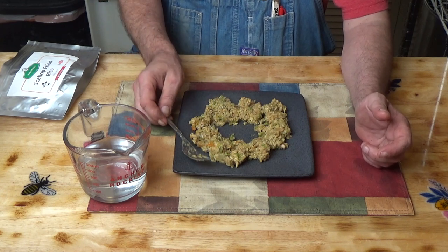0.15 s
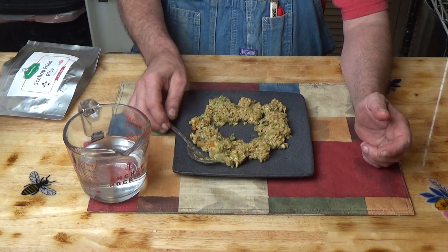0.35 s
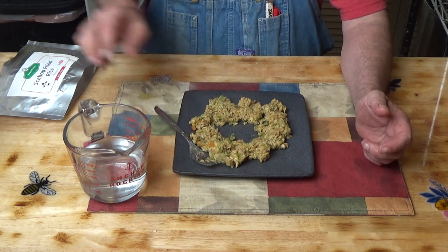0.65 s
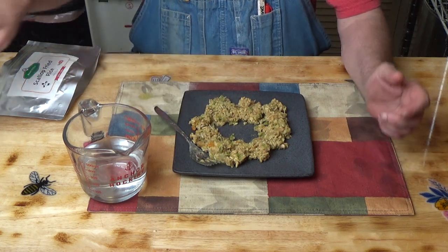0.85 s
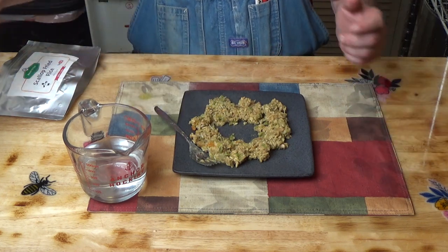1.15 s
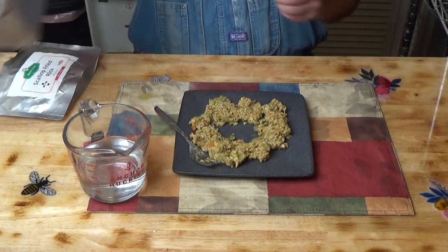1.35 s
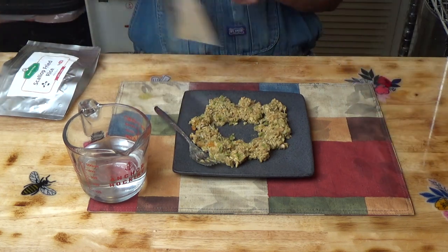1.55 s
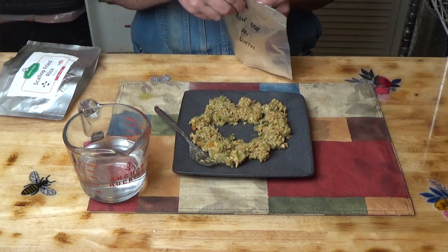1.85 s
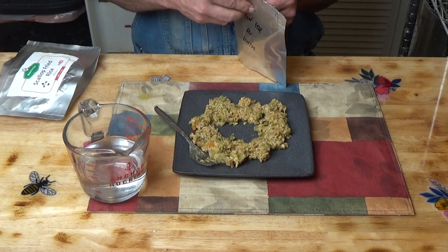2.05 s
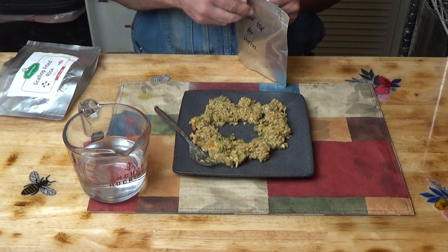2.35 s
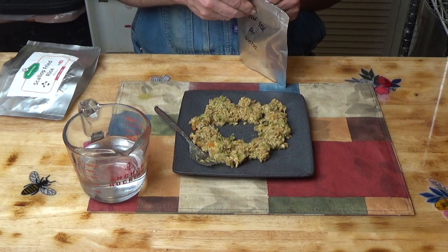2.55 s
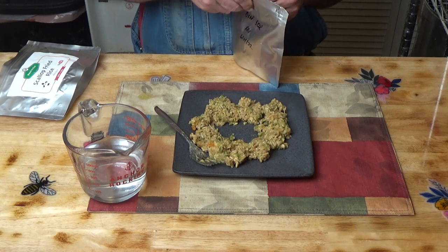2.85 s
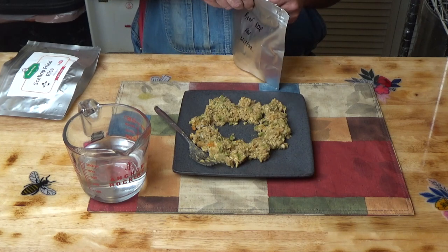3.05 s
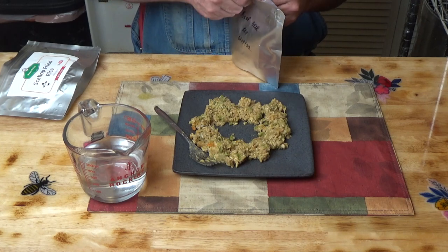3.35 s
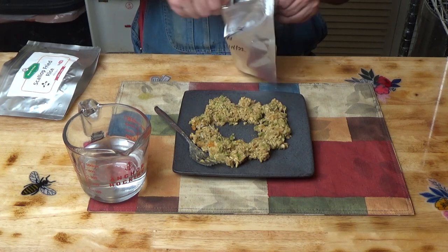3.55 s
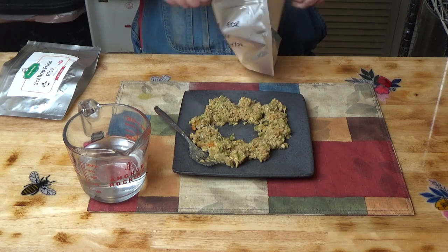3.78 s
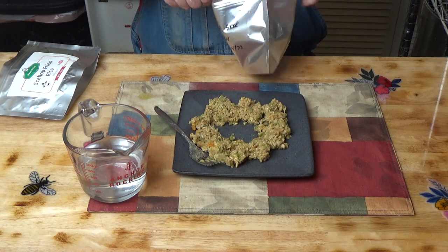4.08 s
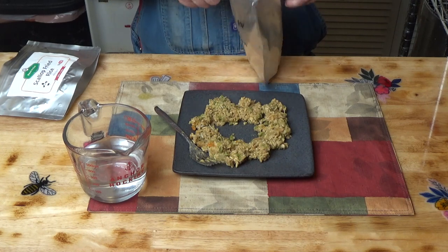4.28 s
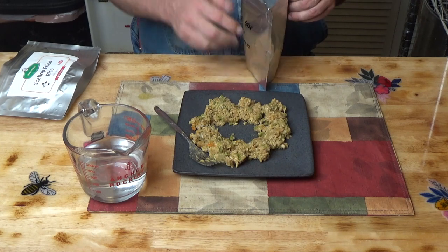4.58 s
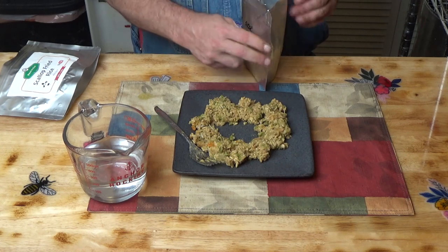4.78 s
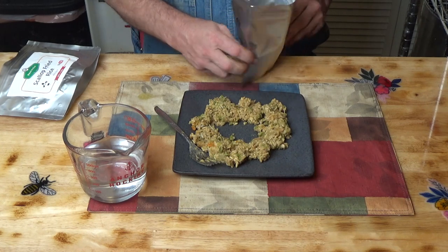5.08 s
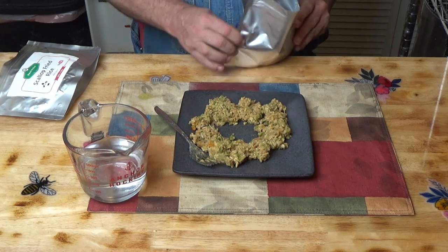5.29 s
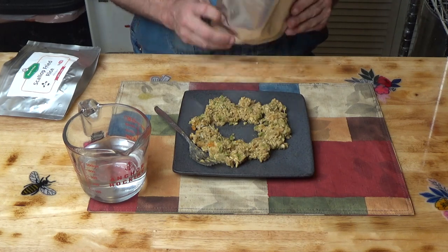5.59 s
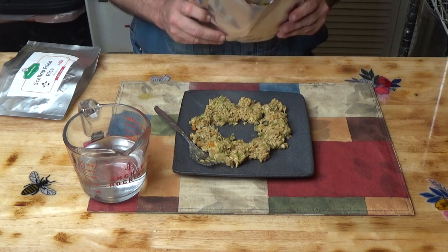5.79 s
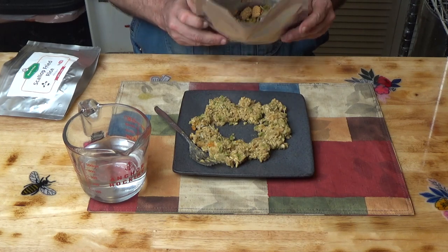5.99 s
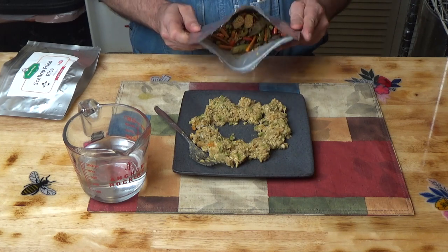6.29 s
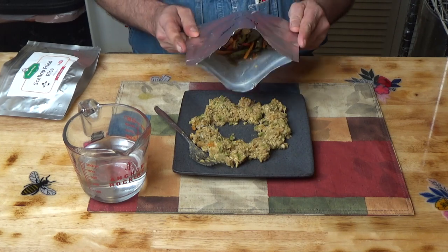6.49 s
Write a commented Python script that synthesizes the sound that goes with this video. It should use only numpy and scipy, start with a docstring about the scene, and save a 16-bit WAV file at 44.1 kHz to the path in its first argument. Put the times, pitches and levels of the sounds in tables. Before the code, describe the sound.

At about 0.3 seconds a steel fork hits a stoneware plate with a sharp, bright clink, then chatters through several quick ringing bounces and rests by 0.7 seconds. This is the loudest sound. From about 0.9 seconds hands flex a foil food pouch, making quieter hollow pops, crisp crease snaps and soft finger rustling, with clusters around 1 and 1.7 seconds and lighter crackles until 3. The strongest crackling comes from 3.5 to 3.7 seconds as the pouch is pulled at. Dry food shifts and lands inside with small thuds, most clearly near 4.1 seconds. Scattered pops follow, with one sharper snap at 5.3 seconds, then only light rustles and ticks until about 6.5 seconds. Everything sounds close, in a small room with very short reverberation and a faint, steady fan rush and electrical hum underneath.

```python
"""Dropped fork and foil pouch

A steel fork clinks on a stoneware plate and chatters to rest, each bounce a hard crack and a ring.
Two hands then flex a foil food pouch and pull it open: panels pop, creases snap, fingers rustle
over the foil and the dry food shifts inside. Behind it all is a small room with a fan and mains hum.
A fast limiter holds down the clinks."""
import sys
import numpy as np
from scipy import signal
from scipy.fft import rfft, irfft, next_fast_len
from scipy.io import wavfile
from scipy.ndimage import uniform_filter1d, minimum_filter1d

SR = 44100
rng = np.random.default_rng(int(sys.argv[2]) if len(sys.argv) > 2 else 0)


def to_wav(sig):
    """Store sig (one row per channel, or 1-D mono) as 16-bit WAV at the path in sys.argv[1].

    Samples outside -1..1 are clipped; the rate is SR.
    """
    pcm = np.clip(np.atleast_2d(sig), -1, 1) * 32767
    pcm = np.round(pcm).astype(np.int16)
    wavfile.write(sys.argv[1], SR, pcm.T)  # frames by channels


N = 292383

# The fork's hits on the plate. Each row: start in seconds, level in dB,
# the handle's share of the blow from 0 to 1, loss per bounce in dB.
FORK_HITS = [(0.3178, -8, 0.1, 11), (.451, -4, 0.66, 6.5), (.4741, -7, 0.59, 7), (0.506, -18.5, .6, 3),
             (.558, -13.5, .05, 26.5), (0.5766, -15.5, 0, 10), (.611, -28.5, 0.4, 15)]
# The ring of fork on plate. Each row: pitch in Hz, level in dB,
# ring time in seconds before ring_scale shortens it, extra dB when the handle strikes.
CLINK_MODES = [(560, -22, .2, -9), (1024, -16, .16, 3), (1394, -24, .2, 5), (1713, -15, .14, 2),
               (2309, -26, .12, 3), (2684, -4, .07, -4), (2746, -5, .09, 0), (2822, -1, .1, 1),
               (2900, -5, .08, 4), (3241, -22, .09, 10), (3954, -17, .08, 13), (4043, -10, .08, 12),
               (4118, -7, .08, 0), (4675, -4, .05, -2), (4718, 1, .08, -3), (4775, -5, .06, -3),
               (5590, -19, .16, 22), (5755, -10, .1, -8), (6690, -16, .07, 0), (6998, -13, .1, -3),
               (7123, -6, .13, 2), (7480, -18, .14, 12), (7553, -17, .13, 7), (8350, -17, .15, 6),
               (8925, -19, .15, 6), (9500, -17, .12, 2), (10230, -21, .13, 1), (10620, -27, .12, 25),
               (11250, -25, .1, 4), (12580, -23, .09, 3), (14730, -26, .08, 8)]


def fork(ring_db=-6, ring_scale=0.71, scatter_db=-2.5, crack_db=-6, crack_t60=0.017, scrape_db=4,
         bounces=5, bounce_s=0.0075, directions=3, wet_db=-5):
    """The fork chatters after each hit; every bounce cracks and rings the modes at new strengths."""
    out, t = np.zeros(N), np.arange(SR // 4) / SR
    hz, mode_db, t60, handle_db = np.transpose(CLINK_MODES)
    modes = fade(t, ring_scale * t60[:, None]) * np.exp(2j * np.pi * hz[:, None] * t)
    crack_band = signal.butter(2, [900, 10000], "band", fs=SR, output="sos")
    for start, db, handle, loss_db in FORK_HITS:
        for bounce in range(bounces):
            scatter = scatter_db * rng.standard_normal((directions, len(hz)))
            strengths = amp(mode_db + handle * handle_db + scatter)
            phases = np.exp(2j * np.pi * rng.random(strengths.shape))
            ring = np.real(strengths * phases @ modes)
            crack = signal.sosfilt(crack_band, rng.standard_normal(ring.shape) * fade(t, crack_t60))
            blow = amp(ring_db) * ring + amp(crack_db + handle * scrape_db) * crack
            add(out, start + bounce * bounce_s, in_room(amp(db - bounce * loss_db) * blow, wet_db))
    return out


# The pouch buckling. Each row: start in seconds, pop pitch in Hz, pop level in dB,
# crack level in dB, crack brightness in dB per octave.
BUCKLES = [(0.8843, 520, -46, -53.5, 1.5), (.899, 610, -42, -41.5, -15), (0.9386, 613, -22, -26.5, -3.5),
           (0.9874, 630, -50, -57, 10.5), (1.021, 920, -40, -42.5, 4), (1.0523, 660, -26, -33, -8),
           (1.1258, 500, -49, -50.5, 2.5), (1.1717, 966, -42, -53, -11), (1.375, 824, -41.5, -45, -18),
           (1.4158, 710, -39, -30, -4), (1.656, 1110, -24.5, -27, -3.5), (1.6953, 824, -24, -41, -4),
           (1.8384, 790, -21.5, -27.5, -9.5), (1.8577, 1300, -34.5, -40.5, -0.5),
           (1.9744, 796, -62, -38.5, -4.5), (2.218, 900, -67, -64, 6), (2.349, 780, -67, -48, 5),
           (2.395, 800, -34.5, -30, 0.5), (2.415, 800, -61, -38.5, -2), (2.458, 626, -42, -40.5, 1.5),
           (2.627, 700, -58, -52.5, 3), (2.686, 800, -62, -53, 4), (2.7864, 600, -70, -46, 3),
           (2.8605, 1090, -51, -42, -2), (2.8968, 810, -46, -50, 3.5), (3.4831, 730, -30.5, -16.5, -2.5),
           (3.5383, 490, -30, -32, -4.5), (3.5595, 600, -27.5, -28, -8), (3.5623, 770, -25, -20, -7.5),
           (3.6216, 745, -22, -17.5, -6.5), (3.6594, 870, -24, -23, -22), (3.6702, 965, -28, -43, 4.5),
           (3.6801, 410, -24, -45, -17), (3.9056, 806, -35, -47, -12), (3.9133, 730, -30.5, -40.5, -4),
           (4.0408, 750, -32, -29, -12.5), (4.0573, 575, -27.5, -58, -8), (4.077, 717, -21.5, -29, -11.5),
           (4.227, 800, -42, -66, 2), (4.3865, 604, -35.5, -36, -1), (4.5612, 950, -26.5, -34, -17),
           (4.7368, 730, -42.5, -40.5, -2), (5.024, 594, -28, -41, -18), (5.329, 816, -24, -21.5, -7),
           (5.4105, 700, -39, -52, -1), (5.4436, 790, -39, -40, -0.5), (5.6337, 654, -43, -41.5, -11),
           (5.7263, 800, -50, -45, -13), (5.7517, 840, -34, -43.5, -24), (5.88, 800, -49, -44, -14),
           (6.178, 920, -47, -46.5, -7)]
# Shaken food landing in the pouch. Each row: start in seconds, level in dB.
FOOD_THUDS = [(1.838, -29), (3.679, -32), (3.908, -36.5), (4.0778, -24), (4.387, -36.5), (4.563, -33.5),
              (5.331, -30.5)]


def pouch_snaps(wet_db=-5):
    """Foil panels pop as their creases crack, and the food thuds against the bottom."""
    out, t = np.zeros(N), np.arange(SR // 10) / SR
    for start, pop_hz, pop_db, crack_db, tilt_db in BUCKLES:
        snap = amp(pop_db) * panel_pop(pop_hz, t) + amp(crack_db) * crease(tilt_db, t)
        add(out, start, in_room(snap, wet_db))
    for start, db in FOOD_THUDS:
        add(out, start, in_room(amp(db) * thump(t), wet_db))
    return foil_body(out)


def panel_pop(hz, t, tone_db=3, ring_cycles=12, body_db=-3, body_t60=0.032,
              rebound_s=0.00955, rebound_db=-7):
    """A panel flips with a short hollow tone, a flutter and a thump, then springs back once."""
    overtone = amp(-12) * np.sin(2 * np.pi * 2.145 * hz * t)
    tone = (np.sin(2 * np.pi * hz * t) + overtone) * fade(t, ring_cycles / hz)
    band = hz * np.array([0.65, 1.45])
    rebound = flutter(band, np.maximum(t - rebound_s, 0), body_t60)
    body = flutter(band, t, body_t60)
    thump_db = -16 - 4 * np.log2(hz / 750)  # larger, lower panels thump more
    flip = amp(tone_db) * tone + amp(body_db) * body + amp(thump_db) * thump(t)
    return flip + amp(rebound_db) * rebound


# The crack, snap and fizz of a crease. Each row: low edge in Hz, high edge in Hz.
CREASE_BANDS = [(1380, 3860), (3900, 7460), (7800, 12560)]


def crease(tilt_db, t, band_db=(-2, -4, -9.5), crack_t60=0.019, bite_hz=3200, bite_t60=0.016):
    """A crease cracks across three bands and rings briefly; the tighter it is, the brighter."""
    octaves = np.log2(CREASE_BANDS).mean(axis=1)
    gains = amp(band_db + tilt_db * (octaves - octaves[0]))
    crack = sum(gain * flutter(band, t, crack_t60) for band, gain in zip(CREASE_BANDS, gains))
    ring_hz = bite_hz * np.exp(0.037 * rng.standard_normal())
    bite = 2 * np.sin(2 * np.pi * ring_hz * t) * fade(t, bite_t60)
    return crack + amp(-9) * bite


def thump(t, hollow_db=-2, hollow_hz=195, hollow_t60=0.13):
    """The whole pouch is jolted and the air inside rings."""
    hollow = np.sin(2 * np.pi * hollow_hz * t) * fade(t, hollow_t60)
    return flutter(band_hz=(244, 492), t=t, t60=0.033) + amp(hollow_db) * hollow


def flutter(band_hz, t, t60, direct_scale=0.61, rise_s=0.0005, directions=4):
    """A sharp noise burst in one band, new in each direction and tightest on the direct path."""
    decays = t60 * np.where(np.arange(directions) == 0, direct_scale, 1)
    attack = 1 - np.exp(-t / rise_s)
    burst = rng.standard_normal((directions, len(t))) * fade(t, decays[:, None]) * attack
    wave = signal.sosfilt(signal.butter(3, band_hz, "band", fs=SR, output="sos"), burst)
    energy = 0.006 * SR  # as much as 6 ms at rms 1
    return np.sqrt(energy) * wave / np.linalg.norm(wave, axis=1, keepdims=True)


# Finger strokes on the pouch. Each row: peak time in seconds, half width in seconds,
# level in dB, sharpness of the crease from 0 to 1.
FINGER_STROKES = [(0.99, 0.063, -48, .3), (1.333, .013, -60.5, 0.8), (1.56, 0.15, -62.5, 0.05),
                  (1.969, 0.023, -54.5, 0.85), (2.067, .017, -45.5, 0.32), (2.18, 0.041, -67.5, .8),
                  (2.464, 0.078, -55.5, .3), (2.727, 0.031, -51, 0.4), (2.883, 0.041, -54, 0.8),
                  (3.103, 0.017, -49.5, 0.46), (3.228, 0.018, -60, 0.6), (3.457, 0.11, -57, 0.27),
                  (3.522, 0.038, -48.5, 0.3), (4.005, .025, -52.5, 0.64), (4.524, 0.041, -54, 0.6),
                  (4.962, 0.039, -58.5, .1), (5.081, 0.044, -48, .2), (5.266, 0.061, -50.5, 0.27),
                  (5.52, 0.037, -61.5, 0.66), (5.658, 0.057, -61, 0), (5.896, 0.0058, -52, 0),
                  (6.317, .01, -49, 0.9), (6.458, .009, -45.5, 0.25), (6.499, 0.0067, -46, 0.85)]
# The tone of dry food, rubbed foil and a tight crease. Each row: frequency in Hz, relative level in dB.
FOOD_SPECTRUM = [(200, -21), (500, 5), (900, 12.5), (1700, 0.5), (2800, -2), (6000, -7), (14000, -66)]
FOIL_SPECTRUM = [(900, -28), (2000, 14), (3500, 6), (6500, -1.5), (9500, -2), (12000, -38), (16000, -41.5)]
SHARP_SPECTRUM = [(1500, -7), (4000, -2), (7000, -5), (10000, 1), (12500, -4), (16000, -6)]


def rustle(food_db=2, foil_db=-2, settle_t60=0.13, food_settle_db=-16, foil_settle_db=-26.5, wet_db=-4):
    """Fingers rub the foil in swells and the food shifts behind it; both settle after each snap."""
    t = np.arange(N) / SR
    food, foil, sharp = np.zeros((3, N))
    for peak, half_width, db, sharpness in FINGER_STROKES:
        distance = (t - peak) / half_width
        swell = amp(db) * np.exp(-np.minimum(distance ** 2, 60) / 2)
        food += amp(food_db) * swell
        foil += amp(foil_db) * np.sqrt(1 - sharpness ** 2) * swell
        sharp += sharpness * swell
    settling = fade(t[:SR // 2], settle_t60)
    for start, _, pop_db, crack_db, _ in BUCKLES:
        add(food, start, amp(pop_db + food_settle_db) * settling)
        add(foil, start, amp(crack_db + foil_settle_db) * settling)
    food *= crinkle(FOOD_SPECTRUM, clicks_per_s=650, spread_db=1, rub_db=-6)
    foil *= crinkle(FOIL_SPECTRUM, clicks_per_s=700, spread_db=8, rub_db=0)
    sharp *= crinkle(SHARP_SPECTRUM, clicks_per_s=410, spread_db=7.5, rub_db=5.5)
    rubbing = food + foil + sharp
    reverb = signal.fftconvolve(rubbing, room_tail())[:N]
    return foil_body(rubbing + amp(wet_db) * reverb)


def crinkle(spectrum, clicks_per_s, spread_db, rub_db):
    """Tiny clicks of uneven size over a smooth rub."""
    sizes = amp(spread_db * np.minimum(rng.exponential(size=N), 4))
    clicks = (rng.random(N) < clicks_per_s / SR) * sizes * rng.choice([-1, 1], N)
    return coloured(unit(clicks) + amp(rub_db) * rng.standard_normal(N), spectrum)


def crease_ticks(tick_db=-8, spread_db=4, tilt_db=2, per_stroke=2, wet_db=-6):
    """Small creases tick at random under each stroke, louder the harder the fingers press."""
    out, t = np.zeros(N), np.arange(SR // 20) / SR
    for peak, half_width, db, _ in FINGER_STROKES:
        for offset, size in rng.uniform(-1, 1, (per_stroke, 2)):
            tick = amp(db + tick_db + spread_db * size) * crease(tilt_db, t)
            add(out, peak + half_width * offset, in_room(tick, wet_db))
    return foil_body(out)


def foil_body(x, cut_hz=130, sheet_hz=6400, sheet_q=7, sheet_db=-2):
    """The small pouch radiates no bass, and its stiff sheet has a bright resonance."""
    x = signal.sosfilt(signal.butter(3, cut_hz, "high", fs=SR, output="sos"), x)
    return x + amp(sheet_db) * signal.lfilter(*signal.iirpeak(sheet_hz, sheet_q, fs=SR), x)


# The tone of the fan. Each row: frequency in Hz, relative level in dB.
FAN_SPECTRUM = [(15, -39), (25, -21), (102, -6.5), (175, -2.5), (344, 0.5), (451, -5.5), (677, -6.5),
                (1650, -19.5), (2760, -25), (2990, -22.5), (5000, -26), (6560, -34), (7510, -29.5),
                (10700, -36.5), (16000, -25)]
# Mains hum and electronic whine. Each row: pitch in Hz, level in dB.
HUM_TONES = [(59.6, -60), (119.6, -61), (14000, -77.5), (15730, -77.5)]


def fan_and_hum(fan_db=-49):
    """A bed of steady fan rush, mains hum and a faint whine."""
    t = np.arange(N) / SR
    hum = sum(amp(db) * np.sqrt(2) * np.sin(2 * np.pi * (hz * t + rng.random())) for hz, db in HUM_TONES)
    return amp(fan_db) * coloured(rng.standard_normal(N), FAN_SPECTRUM) + hum


# The small room's decay. Each row: frequency in Hz, reverb time in seconds.
ROOM_DECAY = [(150, 0.135), (700, 0.22), (2500, 0.22), (6000, 0.22), (14000, 0.2)]


def room_tail(onset_s=0.00064):
    """The room's short reverb at unit energy, new for every path."""
    hz, t, noise = signal.stft(rng.standard_normal(SR // 3), SR, nperseg=256)
    tail = signal.istft(noise * fade(t, along(ROOM_DECAY, hz)[:, None]), SR, nperseg=256)[1]
    tail *= 1 - np.exp(-(np.arange(len(tail)) / SR / onset_s) ** 2)  # the table top answers first
    return tail / np.linalg.norm(tail)


def in_room(waves, wet_db):
    """The first wave arrives directly; the others leave sideways and return from the walls."""
    direct, *aside = waves
    reflections = sum(signal.fftconvolve(wave, room_tail()) for wave in aside)
    out = amp(wet_db) * reflections / np.sqrt(len(aside))
    add(out, 0, direct)
    return out


def amp(db):
    """Decibels to gain."""
    return 10 ** (np.asarray(db) / 20)


def unit(x):
    """x at rms 1."""
    return x / np.sqrt(np.mean(x ** 2) + 1e-20)


def along(points, hz):
    """A curve of (Hz, value) points, read on a log frequency axis."""
    point_hz, values = np.transpose(points)
    return np.interp(np.log(hz + 1), np.log(point_hz + 1), values)


def fade(t, t60):
    """Exponential decay, 60 dB in t60 seconds."""
    return np.exp(-np.log(1000) * t / t60)


def filtered(x, response):
    """EQ x with a gain given as a function of Hz."""
    size = next_fast_len(N + SR // 2)
    return irfft(rfft(x, size) * response(np.fft.rfftfreq(size, 1 / SR)), size)[:N]


def coloured(x, spectrum):
    """x shaped by a spectrum, at rms 1."""
    return unit(filtered(x, lambda hz: amp(along(spectrum, hz))))


def add(track, start, sound):
    """Mix a sound into the track at start seconds."""
    part = track[round(start * SR):][:len(sound)]
    part += sound[:len(part)]


def scene():
    """Fork, pouch and room tone in mono."""
    return (fork() + pouch_snaps() + rustle() + crease_ticks() + fan_and_hum())[None]


# The microphone's EQ, dull in the top octave. Each row: frequency in Hz, gain in dB.
MIC_EQ = [(60, -1), (9500, 3.5), (11000, -1.5), (12500, -7.5), (16000, -12.5)]


def record(dry, ceiling=0.82, top_hz=16200):
    """The microphone dulls the top, a fast limiter holds the peaks, and all above top_hz is cut."""
    x = filtered(dry[0], lambda hz: amp(along(MIC_EQ, hz)))
    needed_gain = np.minimum(1, ceiling / (np.abs(x) + 1e-9))
    held_gain = minimum_filter1d(needed_gain, size=130)  # about 3 ms
    gain = uniform_filter1d(held_gain, size=64)
    return filtered(x * gain, lambda hz: hz < top_hz)[None]


dry = scene()
out = record(dry)
to_wav(out)
```